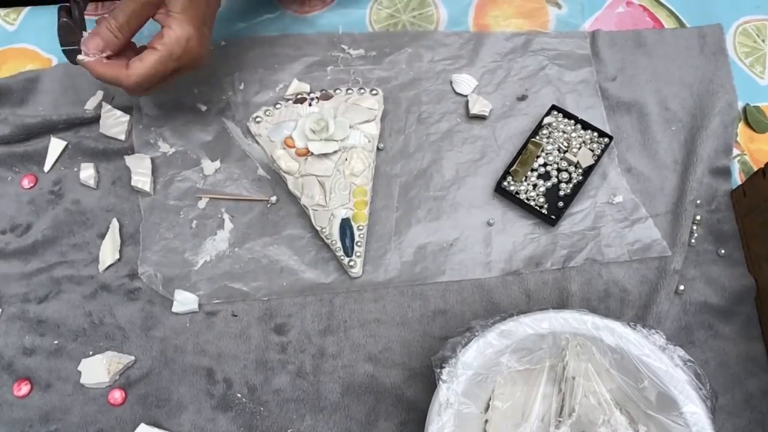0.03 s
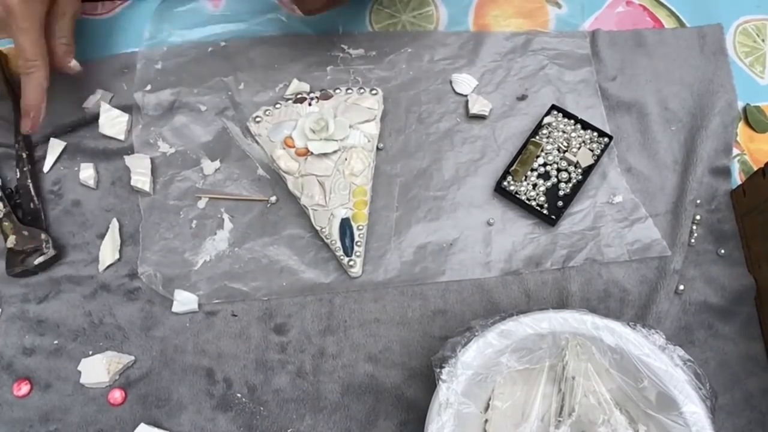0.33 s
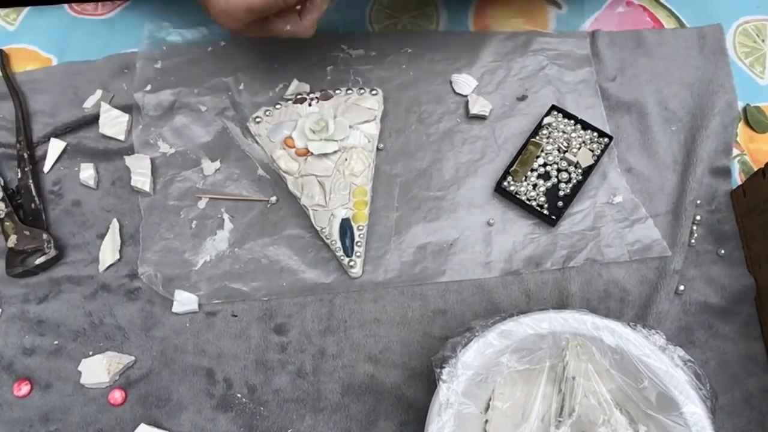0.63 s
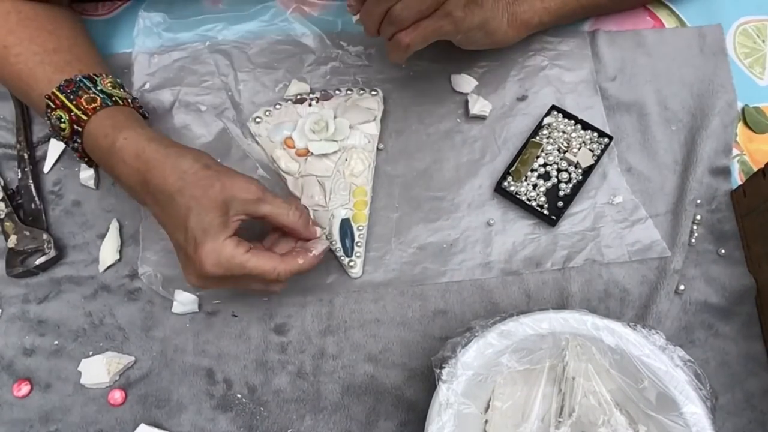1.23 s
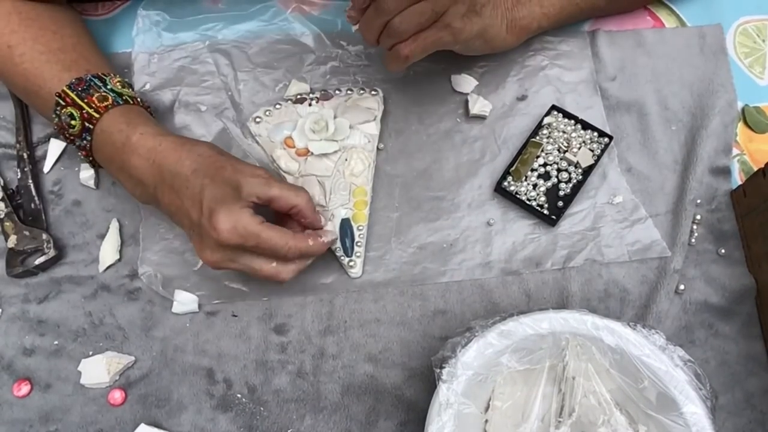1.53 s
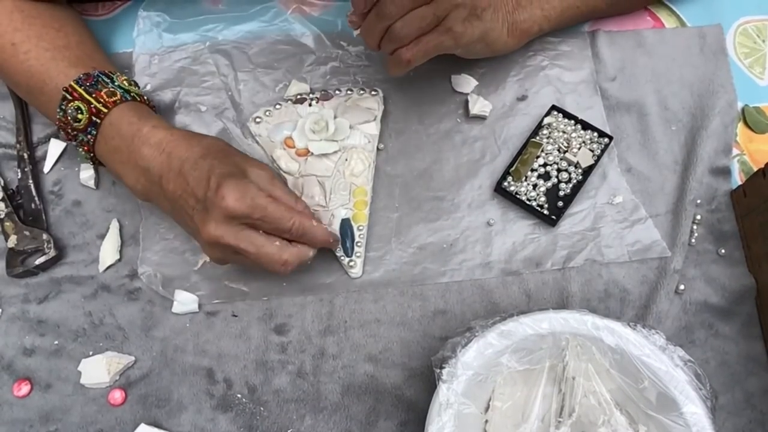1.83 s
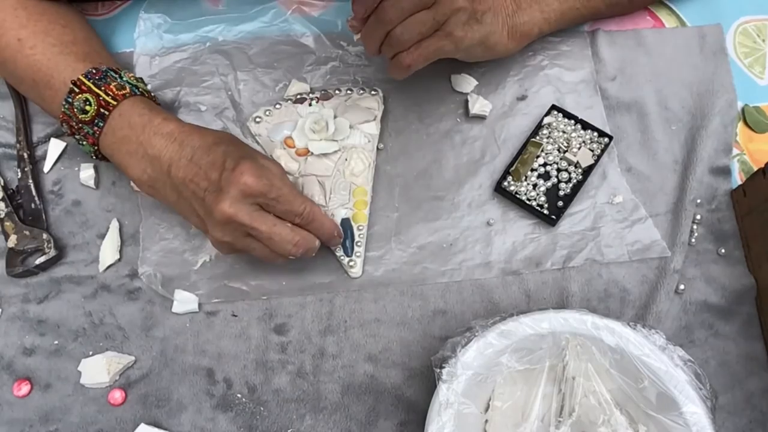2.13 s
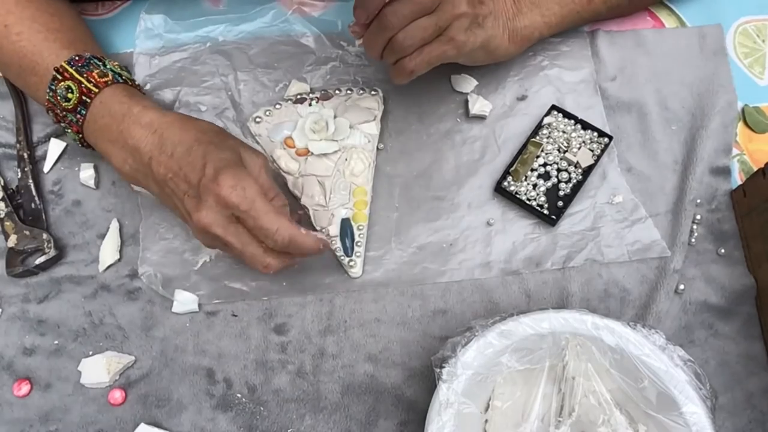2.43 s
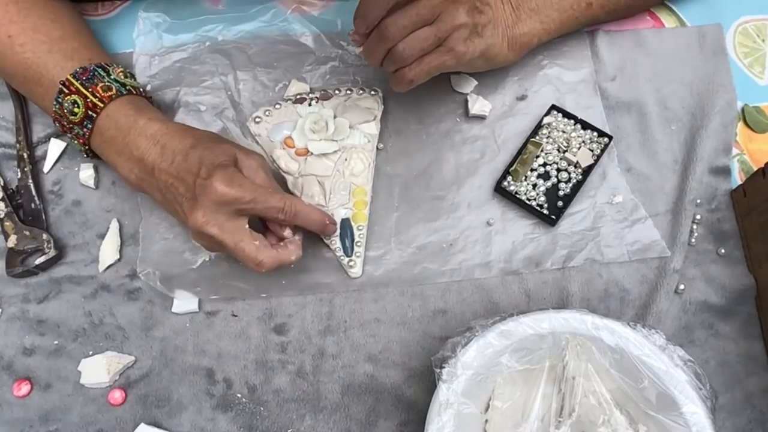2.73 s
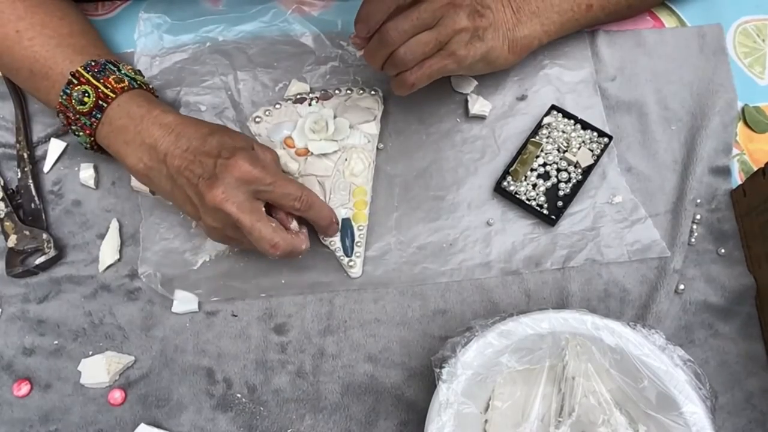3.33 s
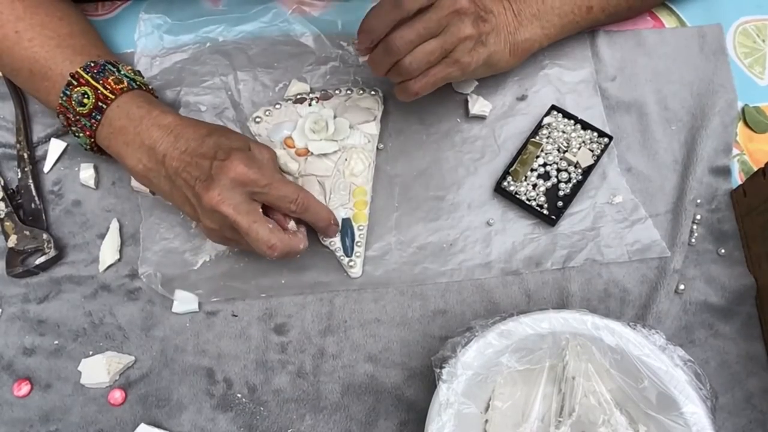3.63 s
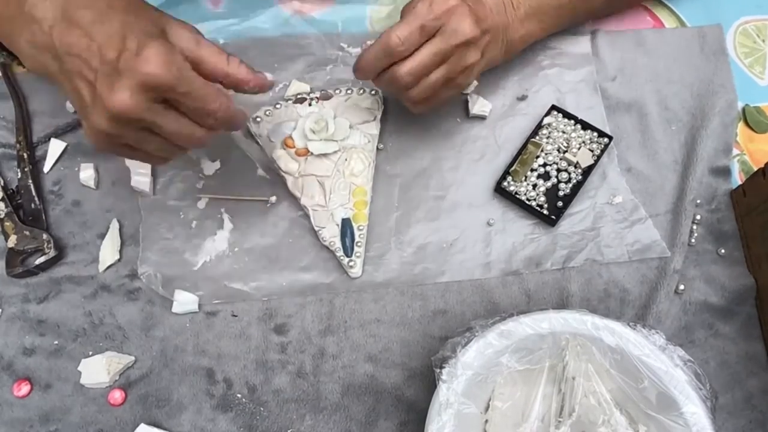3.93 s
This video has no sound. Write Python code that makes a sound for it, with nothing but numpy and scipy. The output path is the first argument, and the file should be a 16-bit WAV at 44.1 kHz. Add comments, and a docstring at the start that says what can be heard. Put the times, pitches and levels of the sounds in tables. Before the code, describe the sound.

In a small room, nippers crack a piece of china, slide across a cloth-covered table and land with a thud and ringing clacks. Faint plastic crinkles follow nearby, over a low hum and a far-off engine gently rising.

```python
"""Steel nippers snap a chip off a piece of china: brittle fracture excites damped resonances.
They drag over a cloth-covered craft table with friction noise, slip with a tiny squeak and are set
down, the impacts driving table modes (a thud) and steel modes (a few ringing clacks).
Fingers then press the chip into a mosaic, faintly crinkling the plastic sheet under it.
Behind the low room hum a distant engine picks up speed, its harmonics rising with the firing rate."""
import sys
import numpy as np
from scipy import signal
from scipy.fft import rfft, irfft
from scipy.io import wavfile

SR = 44100
rng = np.random.default_rng(int(sys.argv[2]) if len(sys.argv) > 2 else 0)


def output_pcm(signal):
    """Save a mono or channel-first signal as 16-bit PCM at the path in sys.argv[1].

    Samples are clipped to [-1, 1] before scaling.
    """
    pcm = np.clip(np.atleast_2d(signal).T, -1, 1) * 32767
    wavfile.write(sys.argv[1], SR, np.round(pcm).astype(np.int16))


N = 176400
ROOM_T60_S = 0.048


def from_db(db):
    """Amplitude ratio of a level in decibels."""
    return 10 ** (np.asarray(db) / 20)


def unit_rms(x):
    """Normalisation to an rms of one."""
    return x / np.sqrt(np.mean(x ** 2) + 1e-20)


def in_time(rows):
    """Linear interpolation of each column against the first, time, at every sample."""
    times, *columns = np.transpose(rows)
    return [np.interp(np.arange(N) / SR, times, column) for column in columns]


def noise(spectrum):
    """Spectral shaping of white noise, at unit rms."""
    hz, db = np.transpose(spectrum)
    bins = np.maximum(np.fft.rfftfreq(N, 1 / SR), 1)
    gain = from_db(np.interp(np.log(bins), np.log(hz), db))
    return unit_rms(irfft(rfft(rng.standard_normal(N)) * gain, N))


def drift(corner_hz):
    """Random fluctuation: low-passed noise of unit rms."""
    attenuation = 1 + (np.fft.rfftfreq(N, 1 / SR) / corner_hz) ** 2
    return unit_rms(irfft(rfft(rng.standard_normal(N)) / attenuation, N))


def impulses(times, db):
    """Impulse train with the given times and levels."""
    train = np.zeros(N)
    np.add.at(train, np.clip(np.asarray(times) * SR, 0, N - 1).astype(int), from_db(db))
    return train


def decay(x, t60):
    """Exponential decay after each impulse."""
    return signal.lfilter([1], [1, -np.exp(-np.log(1000) / (t60 * SR))], x + 1e-18)


def mode(x, hz, t60):
    """Damped oscillator: a unit impulse starts a decaying sine of amplitude one."""
    r = np.exp(-np.log(1000) / (t60 * SR))
    w = 2 * np.pi * hz / SR
    return signal.lfilter([0, np.sin(w)], [1, -2 * r * np.cos(w), r * r], x + 1e-18)


def resonance(x, hz, width_hz):
    """Second-order band-pass with unit peak gain."""
    r = np.exp(-np.pi * width_hz / SR)
    feedback = [1, -2 * r * np.cos(2 * np.pi * hz / SR), r * r]
    return signal.lfilter(np.array([1, 0, -1]) * (1 - r * r) / 2, feedback, x + 1e-18)


def reverberate(x, wet_db, t60):
    """Direct sound plus the exponentially decaying diffuse field of a small room."""
    t = np.arange(SR // 2) / SR
    tail = rng.standard_normal(len(t)) * np.exp(-np.log(1000) * t / t60) * (t > .005)
    return x + from_db(wet_db) * signal.fftconvolve(x, tail / np.sqrt(np.sum(tail ** 2)))[:N]


# Spectrum of the room's hum and hiss: f/Hz, relative density/dB
HUM_SPECTRUM = [(20, -68.5), (65, -16), (88, -1), (145, 0.5), (260, -6.5), (350, -13.5), (750, -23.5),
                (1300, -24.5), (2200, -26), (3300, -31.5), (6000, -34), (13000, -34.5), (16000, -43)]
def room_hum():
    """Stationary noise, strongest at low frequencies, forms the ambient floor."""
    return from_db(-55.5) * noise(HUM_SPECTRUM)


# Firing rate: t/s, f/Hz
FIRING_RATE = [(1.65, 81.96), (1.88, 93.7), (2.05, 97.84), (2.3, 97.04), (2.62, 99.3), (2.87, 88.36),
               (3.03, 94.14), (3.15, 101.1), (3.62, 108.2), (3.76, 107.5), (4, 107.7)]
# Engine orders 1 to 3: t/s, then level/dB of each
LOW_ORDERS = [(0.8, -70, -69, -78), (1.7, -64, -73.5, -72.5), (1.95, -52, -56.5, -59.5),
              (2.12, -50, -59.5, -62.5), (2.25, -44.5, -53.5, -63), (2.42, -50, -50, -60),
              (2.6, -52, -75, -61), (2.75, -50, -49.5, -63.5), (2.92, -55, -50, -63),
              (3.03, -53.5, -48.5, -65), (3.16, -48, -57.5, -55.5), (3.3, -47, -58, -56),
              (3.52, -52, -51, -54), (3.66, -54.5, -47.5, -49), (3.9, -51, -51, -51.5)]
# Orders 4 to 6: level/dB relative to order 3
UPPER_ORDERS = [-13, -19.5, -28.5]
# Envelope of the exhaust rush: t/s, level/dB
EXHAUST_LEVEL = [(1.7, -69), (2.2, -61.5), (2.9, -63.5), (3.5, -57), (4, -53.5)]
# Its spectrum: f/Hz, relative density/dB
EXHAUST_SPECTRUM = [(50, -29.5), (100, -14), (200, 5.5), (320, -0.5), (480, -15.5), (800, -22.5),
                    (12000, -33), (16000, -47)]
def distant_engine():
    """Periodic firing makes a harmonic series; walls pass only its low orders and a dull rush."""
    jitter, flutter_db, flutter_hz = 0.0079, 2, 10.96
    firing_hz, = in_time(FIRING_RATE)
    phase = 2 * np.pi * np.cumsum(firing_hz * (1 + jitter * drift(flutter_hz))) / SR
    levels = in_time(LOW_ORDERS)
    levels += [levels[-1] + db for db in UPPER_ORDERS]
    drone = 0
    for order, db in enumerate(levels, 1):
        amplitude = np.sqrt(2) * from_db(db + flutter_db * drift(flutter_hz))
        drone += amplitude * np.sin(order * phase + 2 * np.pi * rng.random())
    return drone + from_db(in_time(EXHAUST_LEVEL)[0]) * noise(EXHAUST_SPECTRUM)


# Creases that flip: t/s, relative level/dB, centre f/Hz
CREASE_FLIPS = [(0.8556, -46.5, 9000), (0.877, -59, 9000), (0.8919, -50.5, 10100), (0.9264, -52.5, 5970),
                (0.933, -52, 6000), (0.9977, -47, 5900), (1.054, -50.5, 5170), (1.111, -49.5, 5500),
                (1.236, -54.5, 10000), (1.2748, -46.5, 8000), (1.373, -55, 9000), (2.1408, -53, 11000),
                (2.481, -52.5, 3000), (2.616, -53.5, 4500), (3.218, -52.5, 7040)]
# Envelope of the fine crinkle: t/s, level/dB
CRINKLE_LEVEL = [(0.72, -78.5), (0.92, -68), (1.12, -72.5), (1.19, -77), (1.29, -69.5), (1.45, -79),
                 (2.4, -92), (2.52, -76), (2.8, -81)]
def plastic_sheet():
    """Buckling creases radiate single ticks over a faint Poisson train of tiny clicks."""
    tick_gain_db, grains_per_s, spread_db = 2.5, 830, 5
    grit = rng.standard_normal(N)
    ticks = 0
    for onset, db, hz in CREASE_FLIPS:
        envelope = decay(impulses([onset], [db + tick_gain_db]), t60=0.015)
        ticks += resonance(grit * envelope, hz, width_hz=7600)
    sizes = from_db(spread_db * np.minimum(rng.exponential(1, N), 4)) * rng.choice([-1, 1], N)
    occurs = rng.random(N) < grains_per_s / SR
    grains = resonance(sizes * occurs, hz=5350, width_hz=4200)
    crinkle = from_db(in_time(CRINKLE_LEVEL)[0]) * unit_rms(grains)
    return reverberate(ticks + crinkle, wet_db=-12, t60=ROOM_T60_S)


# Soft bumps of the hand: t/s, level/dB
HAND_BUMPS = [(0.0038, -31.5), (0.012, -26), (0.0297, -29)]
# Envelopes of the drag: t/s, rumble level/dB, rubbing level/dB
DRAG_LEVELS = [(0, -35.5, -58), (0.08, -42, -55), (0.13, -39, -56), (0.3, -41, -56.5), (0.33, -75, -87),
               (0.4, -110, -110)]
# Spectra of the rumble and the rubbing: f/Hz, relative density/dB
RUMBLE_SPECTRUM = [(25, -32), (42, 5), (63, 2.5), (140, 3), (210, -2), (330, -16.5), (460, -63),
                   (1000, -48)]
RUB_SPECTRUM = [(200, 3), (500, 0), (1400, 3), (2200, -8), (3500, -17.5), (6000, -21.5), (16000, -29)]
def cloth_drag():
    """Sliding friction of hand and tool on cloth makes noise, opening with a few damped bumps."""
    rumble_db, rub_db = in_time(DRAG_LEVELS)
    bumps = mode(impulses(*np.transpose(HAND_BUMPS)), hz=580, t60=0.0083)
    return bumps + from_db(rumble_db) * noise(RUMBLE_SPECTRUM) + from_db(rub_db) * noise(RUB_SPECTRUM)


# Harmonics 1 to 6 of the squeak: relative level/dB
SQUEAK_HARMONICS = [0, -1, -14, -2.5, -5, -5]
def steel_squeak():
    """Uneven stick-slip oscillation gives a brief wavering tone just before the steel lands."""
    centre_s, width_s, slip_hz, jitter = 0.3185, 0.0055, 2170, 0.0134
    t = np.arange(N) / SR - centre_s
    phase = 2 * np.pi * np.cumsum(slip_hz * (1 + jitter * drift(corner_hz=300))) / SR
    tone = sum(from_db(db) * np.sin(k * phase) for k, db in enumerate(SQUEAK_HARMONICS, 1))
    return from_db(-55.5) * np.exp(-(t / width_s) ** 2) * tone


# Impacts of tool on table: t/s, relative level/dB of thud, crack and ring, part struck (0-2)
IMPACTS = [(0.351, -16, -22, -29, 0), (0.3576, -38, -28.5, -38, 0), (0.3656, -29.5, -42, -61, 0),
           (0.3842, -26, -57, -36, 1), (0.4009, -40, -34, -52, 1), (0.4499, -30.5, -43, -37, 2)]
# Steel modes: f/Hz, T60/s, relative level/dB when struck on jaws (0), one handle (1), the other (2)
STEEL_MODES = [(3267, 0.11, -19, -41, -25), (4440, 0.5, -28, -22.5, -38), (4530, 0.1, -32, -2, -22),
               (6580, 0.086, -17, -12, -17), (6820, 0.026, -4.5, 1, -27), (8140, 0.15, -9, -24, -8.5),
               (8210, 0.018, 3, -4, 3.5), (8400, 0.062, -22, 4, -20), (10350, 0.045, -2, 0, -20),
               (10510, 0.013, 2, -4, 6.5), (12500, 0.076, -15, -5, -27), (12600, 0.02, -8, -12, -10),
               (14000, 0.092, -9, -9, -29), (15540, .06, -16, -19, -32)]
# Table-top modes: f/Hz, relative level/dB, T60/s
TABLE_MODES = [(123, -11.5, 0.12), (153, -16.5, 0.13), (198, -12.5, 0.24), (244.6, -4.5, 0.14),
               (273, -4.5, 0.082), (320, -29, 0.028), (413, -15, 0.13), (500, -26, 0.038),
               (584, -19.5, 0.055), (657, -22, 0.061), (1045, -24.5, 0.072)]
# Spectrum of an impact's noisy crack: f/Hz, relative density/dB
CRACK_SPECTRUM = [(100, -25), (400, -10), (600, 10), (740, -2), (950, 8), (1400, -4), (2300, -2.5),
                  (2800, -12.5), (5300, -15.5), (9000, -12), (16000, -14)]
def nippers_set_down():
    """Impacts excite normal modes of table and tool; the point of contact weights the steel's modes."""
    times, thud_db, crack_db, ring_db, part = np.transpose(IMPACTS)
    steel = 0
    for hz, t60, *part_db in STEEL_MODES:
        strikes = impulses(times, ring_db + np.array(part_db)[part.astype(int)])
        # Contact lasts a moment: subtracting a fast decay makes the ring swell.
        steel += mode(strikes, hz, t60) - mode(strikes, hz, t60=0.0055)
    force = impulses(times, thud_db)
    thud = 0
    for hz, db, t60 in TABLE_MODES:
        polarity = 1 if hz > 360 else -1
        thud += polarity * from_db(db) * mode(force, hz, t60)
    thud = signal.sosfilt(signal.butter(2, 132, "high", fs=SR, output="sos"), thud)
    hits = impulses(times, crack_db)
    envelope = decay(hits, t60=0.015) + from_db(-13) * decay(hits, t60=0.072)
    crack = noise(CRACK_SPECTRUM) * envelope / 2
    return reverberate(steel + thud + crack, wet_db=-10, t60=ROOM_T60_S)


# Fractures of the china: t/s, relative level/dB
FRACTURES = [(0.0164, -10.5), (0.0227, -8), (0.0237, -2), (0.0255, -22), (0.0278, -14.5)]
# Resonances of chip and hand-held jaws: f/Hz, bandwidth per filter stage/Hz, relative level/dB
CHIP_RESONANCES = [(4630, 1030, 2.5), (7160, 1300, 6), (7720, 890, -0.5), (8340, 220, -3.5),
                   (10400, 520, -2), (12160, 320, 3.5), (12500, 700, 2), (15000, 2200, -3)]
def chip_snap():
    """Brittle fracture releases a quick run of bursts that excite damped resonances of chip and jaws."""
    bursts = decay(impulses(*np.transpose(FRACTURES)), t60=0.0078) * rng.standard_normal(N)
    body = 0
    for hz, width_hz, db in CHIP_RESONANCES:
        band = resonance(resonance(bursts, hz, width_hz), hz, width_hz)  # two stages: steep skirts
        body += from_db(db) * np.sqrt(SR / width_hz) * band
    return reverberate(from_db(-15.5) * body / 2, wet_db=-21.5, t60=0.11)


def scene():
    """Superposition of the work at the table, the engine and the room hum in one channel."""
    nippers = chip_snap() + nippers_set_down() + cloth_drag() + steel_squeak()
    return (nippers + plastic_sheet() + distant_engine() + room_hum())[None]


def record(dry):
    """Band limiting: a steep elliptic low-pass cuts the treble above 16 kHz."""
    return signal.sosfilt(signal.ellip(10, .1, 80, 16000, fs=SR, output="sos"), dry)


dry = scene()
out = record(dry)
output_pcm(out)
```